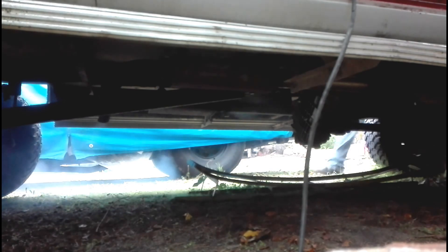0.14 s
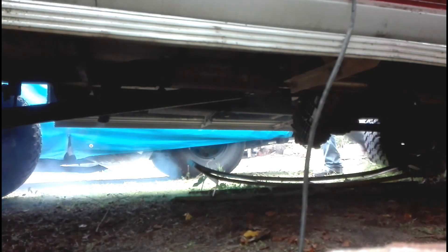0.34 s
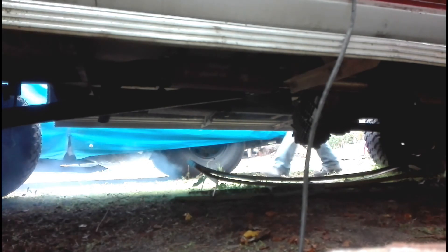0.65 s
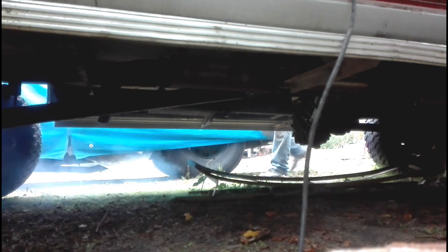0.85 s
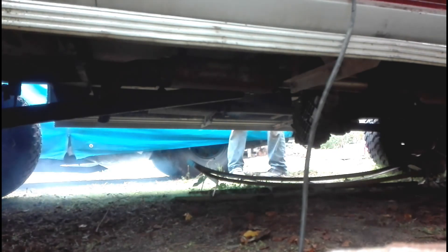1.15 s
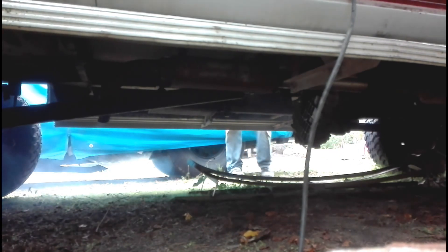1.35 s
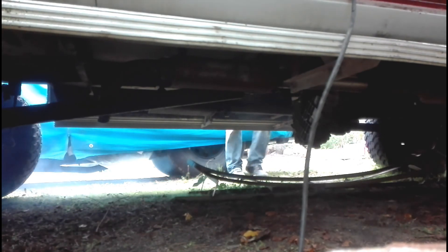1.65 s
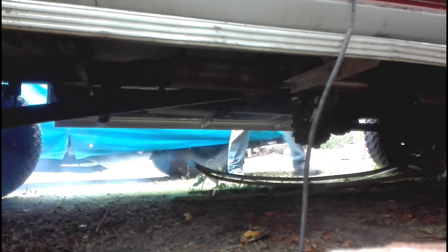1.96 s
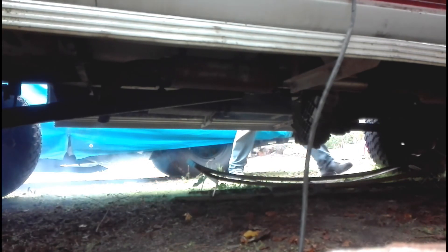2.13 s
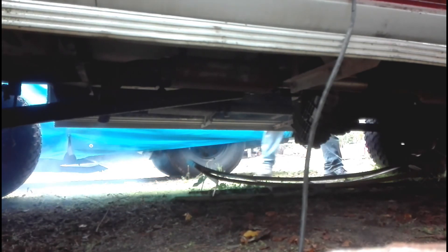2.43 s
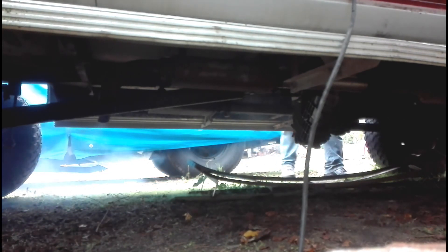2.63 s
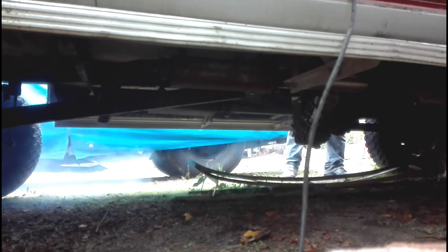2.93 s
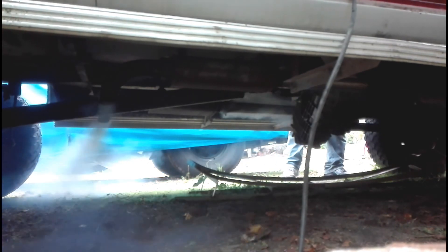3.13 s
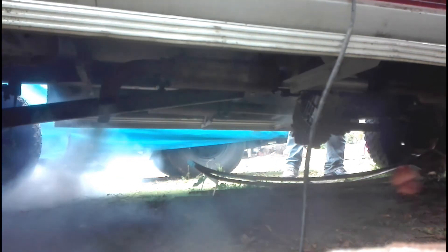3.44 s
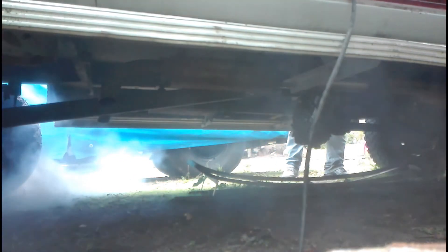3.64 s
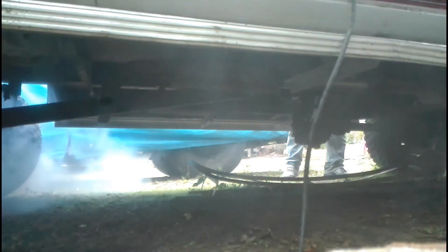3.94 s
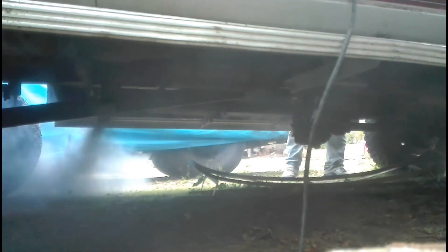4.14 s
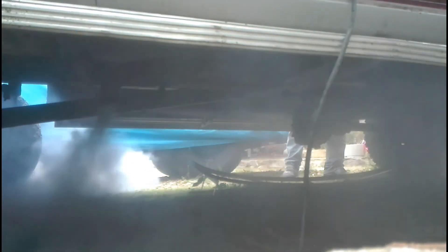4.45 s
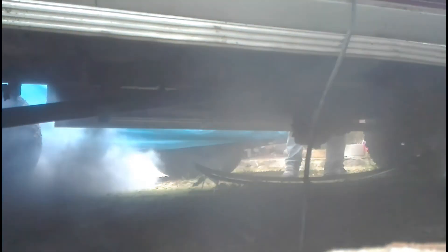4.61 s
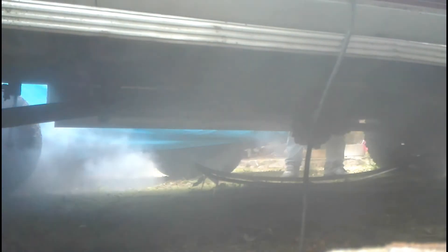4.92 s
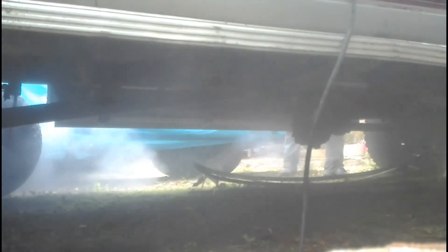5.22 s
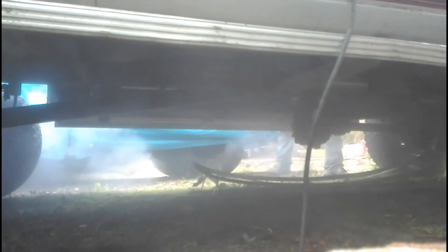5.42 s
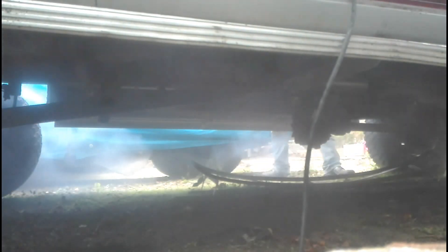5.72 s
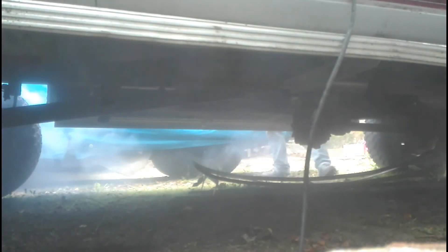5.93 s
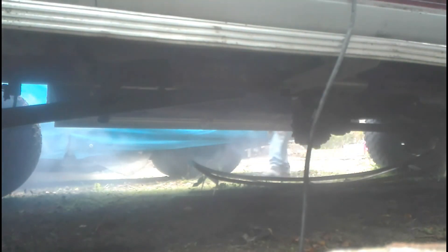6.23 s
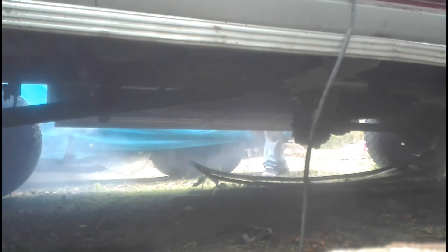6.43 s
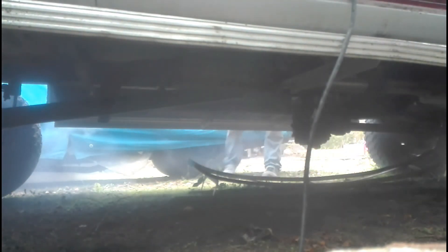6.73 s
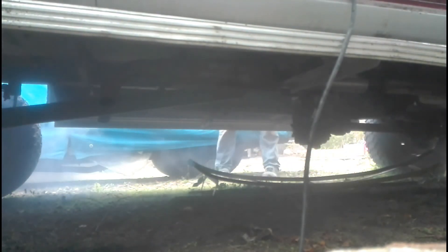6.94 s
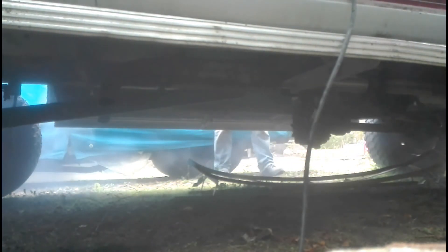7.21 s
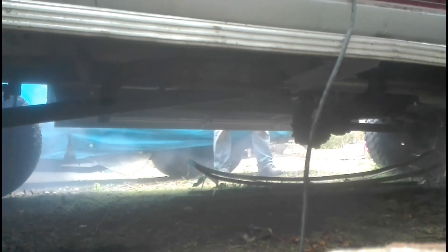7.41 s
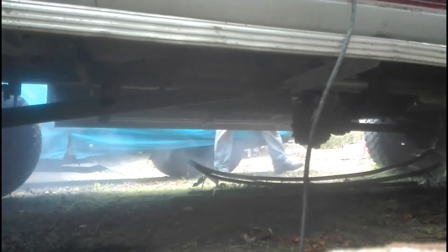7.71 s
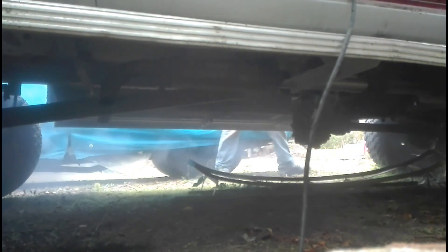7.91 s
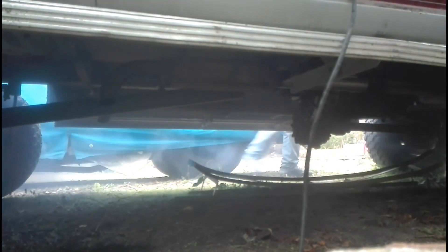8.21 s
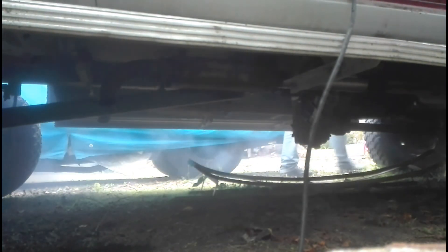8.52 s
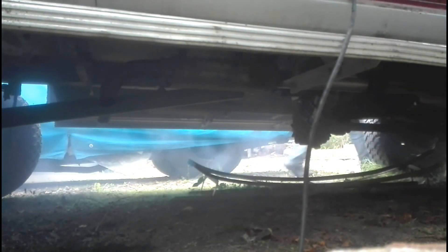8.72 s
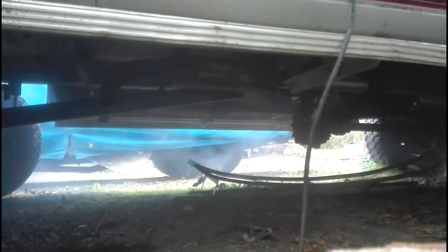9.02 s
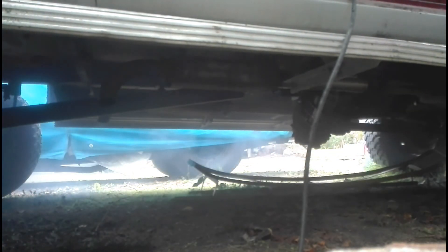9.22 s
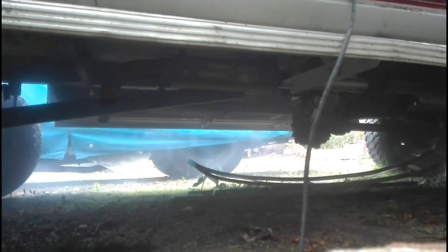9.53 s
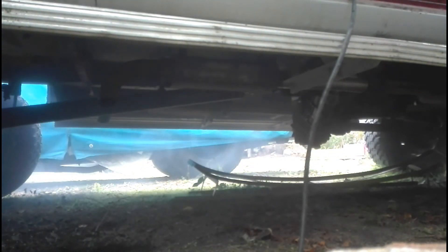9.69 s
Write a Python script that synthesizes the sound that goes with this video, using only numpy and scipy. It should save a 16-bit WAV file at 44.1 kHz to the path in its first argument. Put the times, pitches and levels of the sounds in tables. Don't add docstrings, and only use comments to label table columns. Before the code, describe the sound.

A large eight-cylinder diesel idles outdoors, heard from ground level under a trailer: deep uneven exhaust thumps, hard block knocks and bright ticking clatter. It revs briefly, cracking and hissing, drops back, then revs again much harder with a burst of sharp exhaust cracks and a tick of grit. The idle returns quieter, as the recorder's gain has been pulled down. Nearly mono, close and dry.

```python
import sys
import numpy as np
from scipy import signal
from scipy.fft import rfft, irfft, next_fast_len
from scipy.io import wavfile
from scipy.ndimage import uniform_filter1d

SR = 44100
rng = np.random.default_rng(int(sys.argv[2]) if len(sys.argv) > 2 else 0)


def gain_from_db(level_db):
    decades = np.asarray(level_db, float) / 20
    return 10 ** decades


def put_to_file(sound):
    columns = np.atleast_2d(sound).T
    safe = np.clip(columns, -1, 1)
    whole_steps = np.round(safe * 32767)
    wavfile.write(sys.argv[1], SR, whole_steps.astype(np.int16))


N = 434826

# centre_hz, width_hz, signed_gain (linear)
PIPE_MODES = [(50.2, 28.3, 4.5), (60.7, 21.34, -4.5), (85, 27.3, -0.61), (173, 48, 0), (130.4, 30, -0.1177)]
# centre_hz, width_hz, gain_db
UPPER_PIPE_MODES = [(121, 34, -17), (178, 32, -16.5), (215.6, 42, -15), (262, 33, -21), (319, 23, -18)]


def exhaust(fired):
    size = next_fast_len(N + SR)
    s = 1j * np.fft.rfftfreq(size, 1 / SR)
    pipe = sum(gain * resonance(s, hz, width) for hz, width, gain in PIPE_MODES)
    pipe = pipe / (1 + (abs(s) / 300) ** 8)
    upper = -sum(gain_from_db(db) * resonance(s, hz, width) for hz, width, db in UPPER_PIPE_MODES)
    upper = upper / (1 + (abs(s) / 310) ** 8)
    idle, pulling, _ = load_shares()
    blows = fired * gain_from_db(blow_db() + 53.5)
    edge = blows * gain_from_db(-14.0 * idle - 3.2 * pulling)
    cycle = np.searchsorted(crank(), CRANK_START + 8)
    blows = np.r_[blows, np.zeros(size - N - cycle), blows[:cycle]]
    return irfft(rfft(blows, size) * pipe + rfft(edge, size) * upper, size)[:N]


def resonance(s, hz, width_hz):
    return s * width_hz / (s * s + s * width_hz + hz * hz)


# strength_db at idle, pulling, coasting; delay_ms at idle, pulling, coasting
CYLINDER_TRAITS = [(1.6, -3.5, 1.6, -1.1, -0.7, -1.9), (4.0, 3.5, 0.4, -0.8, -1.2, -2.1),
                   (0.9, 1.2, -0.4, 0.5, 0.6, -1.8), (-4.8, -4.9, 1.5, -1.3, -1.1, -2.3),
                   (0.4, 3.5, -0.5, -1.7, -0.6, -1.8), (1.0, -4.8, -0.7, -1.5, 0.3, -1.2),
                   (1.8, 3.2, -0.3, -1.1, -1.8, -2.6), (3.1, 3.8, 0.8, -0.4, -0.4, -1.7)]


def firings(spread_db, jitter_ms):
    turn = crank()
    number = np.arange(1, int(turn[-1]))
    at = np.interp(number, turn, np.arange(N))
    shares = np.array(load_shares())[:, at.astype(int)].T
    rows = np.array(CYLINDER_TRAITS)[number % 8]
    luck = rng.standard_normal((len(number), 2))
    strength_db = (shares * rows[:, :3]).sum(1) + spread_db * luck[:, 0]
    delay_ms = (shares * rows[:, 3:]).sum(1) + jitter_ms * luck[:, 1]
    train = np.zeros(N)
    train[np.clip(at + delay_ms * SR / 1000, 0, N - 1).astype(int)] = gain_from_db(strength_db)
    return train


# speed_firings_per_s, level_db
PULLING_BLOWS = [(58, -23), (84, -15.5), (100, -11), (127, -7), (180, 2)]
# speed_firings_per_s, level_db
COASTING_BLOWS = [(55, -41.5), (63, -31.5), (80, -23), (105, -12.5), (125, -11.5), (175, -7.5)]


def blow_db():
    speed = curve(ENGINE_SPEED)
    idle = -26 + 1.45 * np.maximum(IDLE_RATE - speed, 0)
    pulling = np.interp(speed, *np.transpose(PULLING_BLOWS))
    coasting = np.interp(speed, *np.transpose(COASTING_BLOWS))
    return by_load(idle, pulling, coasting)


# start_s, peak_db
EXHAUST_CRACKS = [
    (3.031, -18.5),
    (3.062, -22),
    (3.13, -13.5),
    (4.078, -23),
    (4.136, -10.5),
    (4.194, -3.5),
    (4.246, -2),
    (4.293, -3),
]


def cracks():
    t, out = np.arange(3000) / SR, np.zeros(N)
    push = -(t / 0.00048) * np.exp(1 - t / 0.0004) * (1 - t / 0.0042)
    low_ring = 0.21 * np.exp(-t / 0.016) * np.sin(2 * np.pi * 485 * t)
    high_ring = 0.26 * np.exp(-t / 0.0066) * np.sin(2 * np.pi * 830 * t)
    crack = push + low_ring + high_ring
    for s, db in EXHAUST_CRACKS:
        out[round(s * SR):][:len(t)] += gain_from_db(db + 6.5) * crack
    return out


# crank_place_firings, pitch_hz, t60_s, level_db
BLOCK_KNOCKS = [(5.15, 1302, .09, 1), (6.3, 1305, .07, -4), (7.2, 1300, .09, 1), (1.1, 1300, .05, -10),
                (2.2, 1300, .05, -10), (2.0, 1470, .03, -2), (5.25, 1480, .04, -4), (6.2, 1450, .03, -7),
                (5.5, 1730, .05, -1), (5.6, 1630, .05, -2), (6.2, 1680, .05, -4), (7.5, 1740, .05, -1),
                (0.0, 1630, .05, -2), (1.0, 1680, .04, -5), (2.3, 1720, .04, -5), (2.6, 1060, .08, -10),
                (4.0, 1050, .08, -10), (6.5, 1060, .08, -10), (0.0, 1070, .07, -11), (3.3, 1200, .04, -8),
                (2.1, 2150, .02, -5), (1.0, 2000, .02, -7), (4.0, 2100, .02, -7), (5.2, 2050, .025, -6),
                (5.8, 2300, .02, -8)]
# crank_place_firings, level_db
VALVE_TICKS = [(5.2, 6), (5.7, -2.5), (6.3, -7.5), (0.8, -4.5), (2.1, 3.5), (4.0, -4.5), (7.0, -8),
               (7.8, -3)]
# freq_hz, density_db (dB per Hz)
CLATTER_SPECTRUM = [(350, -33), (640, -25), (830, -15), (1060, -9), (1150, -9), (1300, -3.5), (1600, -7.5),
                    (2150, -11), (2540, -17.5), (4300, -25), (7160, -30), (9880, -37.5), (11500, -44.5),
                    (14200, -51)]
# idle_db, pulling_db, coasting_db, speed_db_per_octave, crack_lift_db
CLATTER_LEVEL = (-29, -27, -30, 5, 2)


def block(fired):
    ticks = sum(gain_from_db(db) * strikes(place, 1.6, 3.3) for place, db in VALVE_TICKS)
    clatter = wide(puffs(ticks, 7.0, 2.12) * puffs(fired, 10.4, 5.8), CLATTER_SPECTRUM)
    _, _, coasting = load_shares()
    knocks = ring(BLOCK_KNOCKS, 1.24, 0.697, 3.1) * gain_from_db(-4.6 * coasting)
    return gain_from_db(layer_db(*CLATTER_LEVEL)) * (gain_from_db(-3.0) * clatter + gain_from_db(-5.5) * knocks)


# crank_place_firings, pitch_hz, t60_s, level_db
INJECTOR_PINGS = [(2.0, 7200, 0.024, -14), (5.0, 7200, 0.063, -0.5), (7.8, 6500, .025, -8),
                  (1.1, 4250, 0.088, 0), (7, 4100, 0.041, 6), (6.0, 4150, 0.049, 2), (6.2, 8100, 0.025, 2),
                  (3.0, 8000, 0.033, -7), (5.7, 6100, 0.028, 2.5), (0.44, 6100, 0.04, 2),
                  (9.9, 9800, 0.018, -1), (4, 9800, .03, -10.5), (2.1, 1900, 0.053, 9),
                  (5.1, 2750, 0.03, 6.5)]


def pings():
    rattle = 1 + .8 * evened(uniform_filter1d(rng.standard_normal(N), 60))
    _, _, coasting = load_shares()
    level_db = layer_db(*CLATTER_LEVEL) - 24.0 - 2.0 * coasting
    mid = rattle * ring(INJECTOR_PINGS, 2.2, 1.5, 0.96) * gain_from_db(level_db)
    side = colour(np.roll(mid, 173), STEREO_WIDTH)
    return np.array([mid + side, mid - side])


# freq_hz, density_db (dB per Hz)
ROAR_SPECTRUM = [(250, -35), (400, 1), (500, 0), (620, -10), (820, -0.5), (1100, -27)]


def roar():
    above_idle = np.clip(curve(ENGINE_SPEED) / 60.4 - 1, 0, 1)
    noise = evened(colour(rng.standard_normal(N), ROAR_SPECTRUM))
    return gain_from_db(layer_db(*CLATTER_LEVEL) - 9.0) * above_idle * noise


# freq_hz, density_db (dB per Hz)
HISS_SPECTRUM = [(1180, -5), (2000, -12), (2500, -6), (2780, 1.5), (4810, 0.5), (6010, 1), (8270, -5),
                 (14200, -27.5)]
# idle_db, pulling_db, coasting_db, speed_db_per_octave, crack_lift_db
HISS_LEVEL = (-71, -31.5, -43.5, 5.5, 7)


def gas(fired):
    _, pulling, coasting = load_shares()
    share_db = -14.0 + 10.53 * pulling + 12.0 * coasting
    return gain_from_db(layer_db(*HISS_LEVEL) + share_db) * wide(puffs(fired ** 2, 4.7, 0.62), HISS_SPECTRUM)


# freq_hz, density_db (dB per Hz)
RUMBLE_SPECTRUM = [(22, -26), (35, -51), (70, 1), (120, -3), (170, -7.5), (230, -8.5), (300, -11),
                   (480, -17.5), (620, -30), (800, -53)]
# crank_place_firings, pitch_hz, t60_s, level_db
FRAME_THUDS = [(1.3, 222, .06, 0), (6.2, 218, .06, -1), (7.6, 218, .04, -7), (0.0, 100, .1, -2),
               (2.5, 105, .1, 0), (4.5, 95, .1, -4)]
# idle_db, pulling_db, coasting_db, speed_db_per_octave, crack_lift_db
RUMBLE_LEVEL = (-34, -27.5, -30.5, 5, 10)


def rumble(fired):
    noise = evened(colour(rng.standard_normal(N) * puffs(fired, 21.0, 2.0), RUMBLE_SPECTRUM))
    idle, _, _ = load_shares()
    thuds = ring(FRAME_THUDS, 1.5, 0.82, 6.3)
    return gain_from_db(layer_db(*RUMBLE_LEVEL)) * (gain_from_db(-4.5 + 2.6 * idle) * noise + gain_from_db(0.5) * idle * thuds)


# start_s, peak_db
GRIT_HITS = [
    (4.4265, 10),
]
# start_s, length_s, level_db
LEAF_STEPS = [
    (7.616, 0.066, -42),
]


def debris():
    grit, level = np.zeros(N), np.full(N, 1e-4)
    for s, db in GRIT_HITS:
        hit = grit[round(s * SR):]
        hit[:30] = gain_from_db(db) * np.exp(-np.arange(30) / 6.5) * 0.73 * rng.standard_normal(30)
        hit[:3] = gain_from_db(db) * np.array([.3, -1, .3])
    grit = colour(grit, [(900, -36), (2000, 16.0), (5000, 4), (8000, 2), (11000, 5), (14000, -11), (14600, -62)])
    for s, length, db in LEAF_STEPS:
        count = round(length * SR)
        crackle = uniform_filter1d(rng.exponential(1, count) ** 2, 80)
        level[round(s * SR):][:count] = signal.windows.tukey(count, .4) * evened(crackle)
        rustle = wide(level, [(3000, -13), (5000, 5), (6500, 1), (11000, -12), (13000, -37)])
        leaves = gain_from_db(db) * rustle / np.sqrt(N / count)
    return grit + leaves


# time_s, speed_firings_per_s
ENGINE_SPEED = [(0, 58.11), (.4, 55.68), (2.361, 55.31), (2.912, 57.62), (3.145, 128.09), (3.39, 102.99),
                (3.751, 48.41), (3.925, 60.76), (4.248, 164.62), (4.351, 182.38), (4.458, 157.31),
                (5.097, 46.31), (5.232, 54.25), (7.025, 54.4), (7.136, 53.45), (7.482, 54.96), (9.5, 53.75),
                (9.86, 52.6)]
CRANK_START, IDLE_RATE = .15, 55


def crank():
    return CRANK_START + np.cumsum(curve(ENGINE_SPEED)) / SR


def strikes(place, spread_db, jitter_ms):
    grid = np.arange(0, N, 16)
    speed = np.interp(grid / SR, *np.transpose(ENGINE_SPEED))
    turn = CRANK_START + np.cumsum(speed) * grid[1] / SR
    luck = rng.standard_normal((100, 2))
    marks = np.arange(place, turn[-1], 8)
    at = np.interp(marks, turn, grid + grid[1]) + jitter_ms * SR / 1000 * luck[:len(marks), 0]
    train = np.zeros(N)
    train[np.clip(at, 0, N - 1).astype(int)] = gain_from_db(spread_db * luck[:len(marks), 1])
    return train


def ring(parts, spread_db, jitter_ms, rise_ms):
    t, out = np.arange(5000) / SR, np.zeros(N)
    soft_start = 1 - np.exp(-1000 * t / rise_ms)
    for place, hz, t60, db in parts:
        tone = soft_start * gain_from_db(db - 60 * t / t60) * np.sin(2 * np.pi * hz * t)
        train = strikes(place, spread_db, jitter_ms)
        for at in np.flatnonzero(train):
            out[at:at + len(t)] += train[at] * tone[:N - at]
    return evened(out)


def puffs(train, decay_ms, steady):
    t = np.arange(3000) / SR
    shape = (1 - np.exp(-t / 0.0088)) * np.exp(-1000 * t / decay_ms)
    return steady + evened(signal.oaconvolve(train, shape)[:N])


# time_s, load (-1 coasting, 0 idle, 1 pulling)
ENGINE_LOAD = [(0, 0.19), (2.86, 0.11), (2.96, 0.88), (3.15, 0.95), (3.2, -1.02), (3.71, -0.84),
               (3.76, -0.32), (3.9, -0.09), (3.96, 1), (4.32, 0.85), (4.4, -1.13), (5.1, -0.74),
               (5.15, -0.096), (9.86, 0.3)]


def load_shares():
    load = curve(ENGINE_LOAD)
    return 1 - abs(load), np.maximum(load, 0), np.maximum(-load, 0)


def by_load(idle, pulling, coasting):
    idle = np.where(curve(ENGINE_SPEED) > 1.6 * IDLE_RATE, (pulling + coasting) / 2, idle)
    idle_share, pull_share, coast_share = load_shares()
    return idle_share * idle + pull_share * pulling + coast_share * coasting


def layer_db(idle_db, pulling_db, coasting_db, octave_db, crack_db):
    octaves = np.log2(curve(ENGINE_SPEED) / IDLE_RATE)
    return by_load(idle_db, pulling_db, coasting_db) + octave_db * octaves + crack_db * surge()


# start_s, surge_share (of a crack's surge)
GAS_GULPS = [
    (2.96, 0.24),
    (3.0, 0.4),
    (3.995, 0.47),
    (4.052, 1),
]


def surge():
    surge_s = 0.016
    out, shape = np.zeros(N), np.bartlett(round(2 * surge_s * SR))
    for s, share in GAS_GULPS + [(s, 1) for s, _ in EXHAUST_CRACKS]:
        out[round((s - .75 * surge_s) * SR):][:len(shape)] += share * shape
    return out


# freq_hz, side_minus_mid_db
STEREO_WIDTH = [(3000, -70), (3700, -33), (4400, -26.5), (5500, -11.5), (7500, -7), (13800, -1)]


def wide(level, points):
    mid, side = colour(rng.standard_normal((2, N)) * level, points)
    side = colour(side, STEREO_WIDTH)
    return np.array([mid + side, mid - side]) / np.sqrt(np.mean(mid ** 2))


def evened(x):
    return x / np.sqrt(np.mean(x ** 2) + 1e-20)


def curve(rows, column=1):
    rows = np.array(rows)
    return np.interp(np.arange(N) / SR, rows[:, 0], rows[:, column])


def colour(x, points):
    f, db = np.transpose(points)
    size = next_fast_len(N)
    hz = np.fft.rfftfreq(size, 1 / SR)
    gain = gain_from_db(np.interp(np.log(hz + 1), np.log(f + 1), db))
    return irfft(rfft(x, size) * gain, size)[..., :N]


def scene():
    fired = firings(spread_db=.7, jitter_ms=.15)
    engine = exhaust(fired) + cracks() + block(fired) + pings()
    return engine + roar() + gas(fired) + rumble(fired) + debris()


# time_s, gain_db
RECORDER_GAIN = [
    (0, 0),
    (3.03, -0.04),
    (3.17, -6.5),
    (4.0, -2),
    (4.36, -12),
    (5.2, -10),
    (9.3, -10.5),
    (9.86, -9),
]


def levelled(dry):
    treble_hz = 11000
    top = colour(dry, [(treble_hz / 1.5, -40), (treble_hz * 1.08, 0)])
    gain_db = curve(RECORDER_GAIN)
    quiet_db = uniform_filter1d(layer_db(*CLATTER_LEVEL) + gain_db - CLATTER_LEVEL[0], 2000)
    treble_db = 2 + 0.74 * np.minimum(quiet_db, 0)
    return gain_from_db(gain_db) * (dry + top * (gain_from_db(treble_db) - 1))


def roll_off(x):
    return signal.sosfilt(signal.butter(12, 14370, fs=SR, output="sos"), x)


def record(dry):
    mix = np.clip(levelled(dry), -1, 1)
    return roll_off(mix)


dry = scene()
out = record(dry)
put_to_file(out)
```